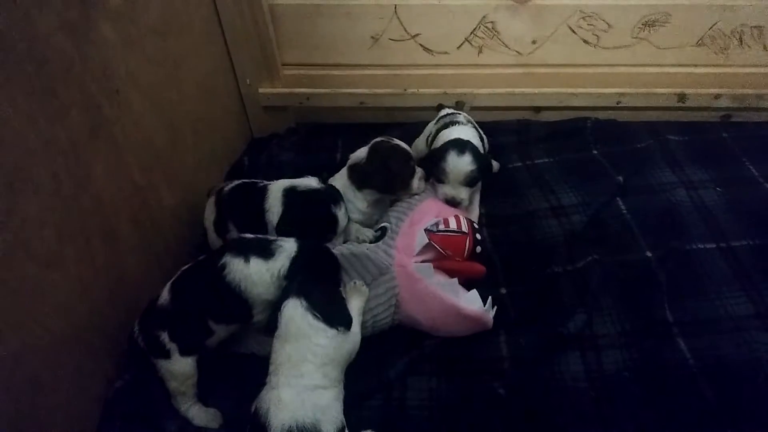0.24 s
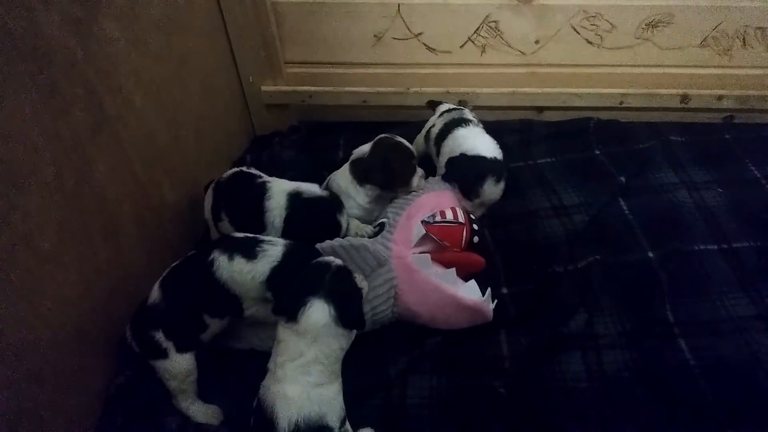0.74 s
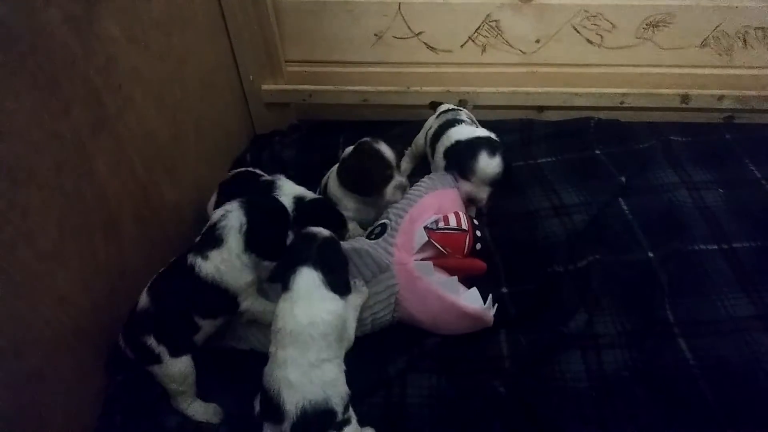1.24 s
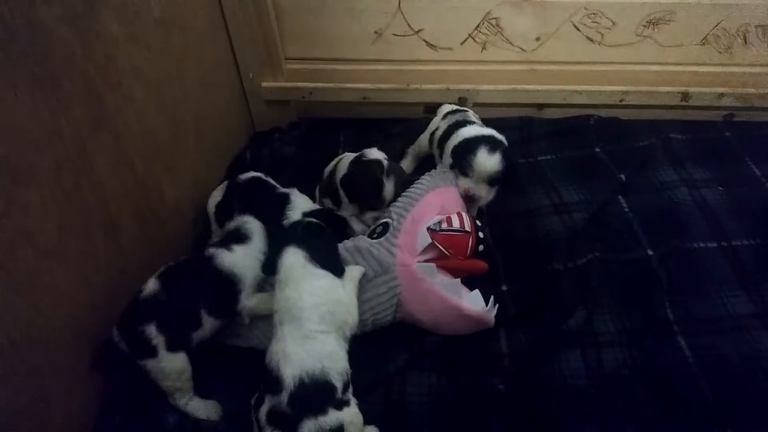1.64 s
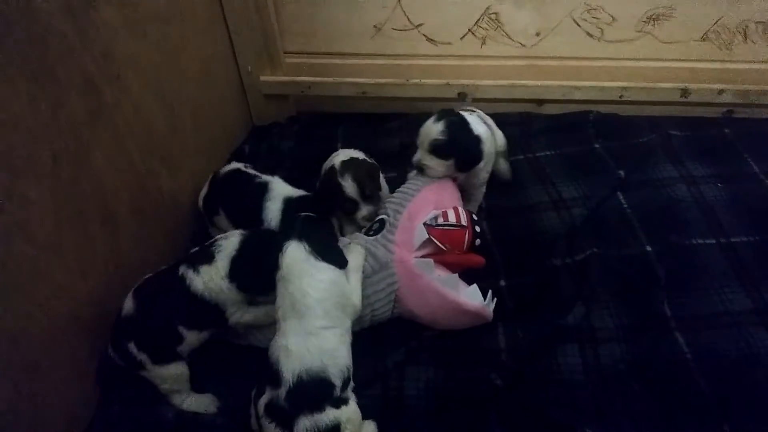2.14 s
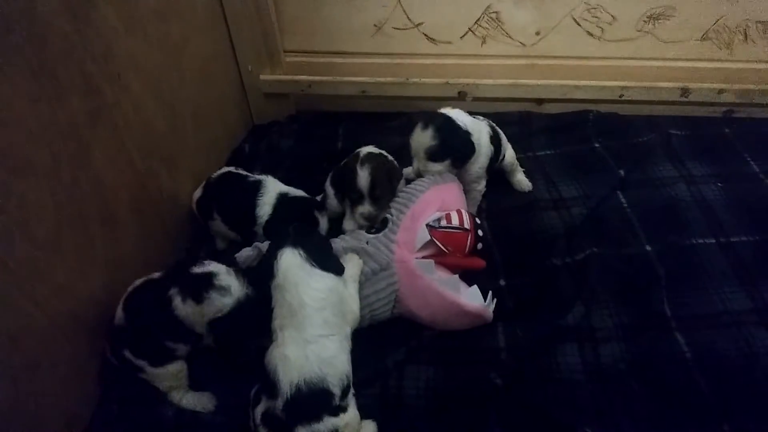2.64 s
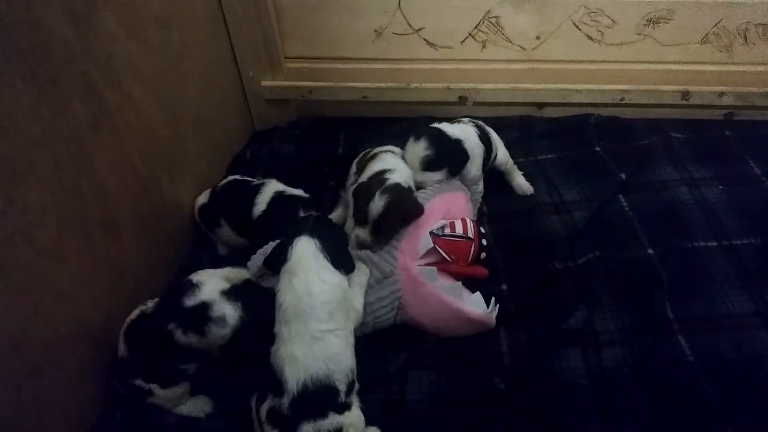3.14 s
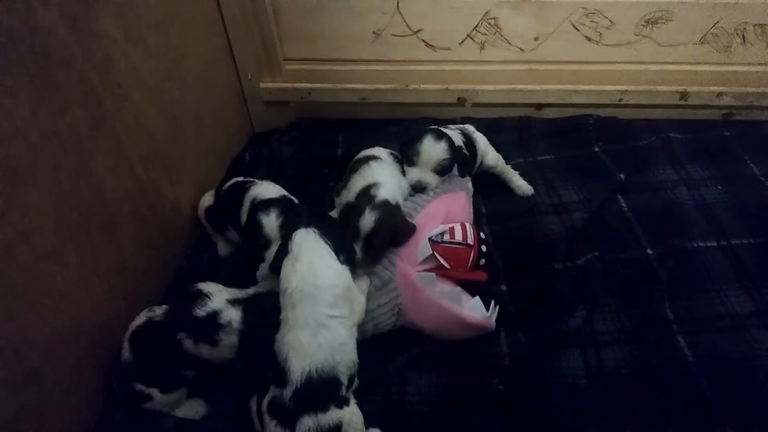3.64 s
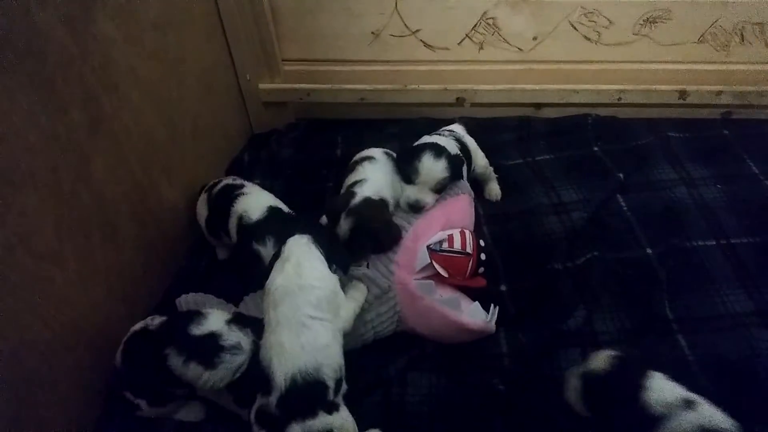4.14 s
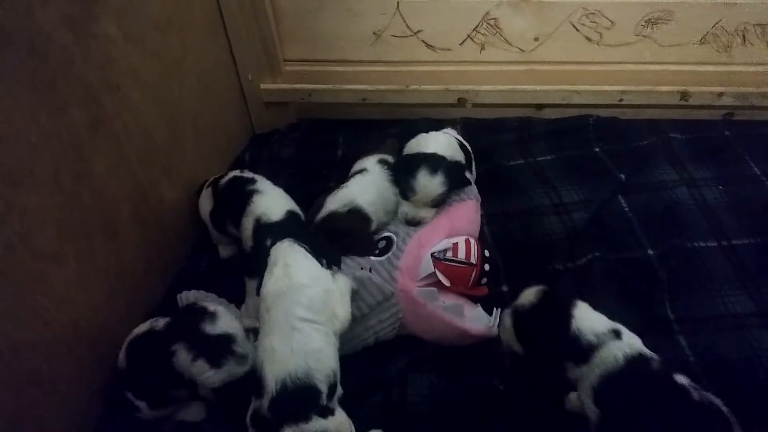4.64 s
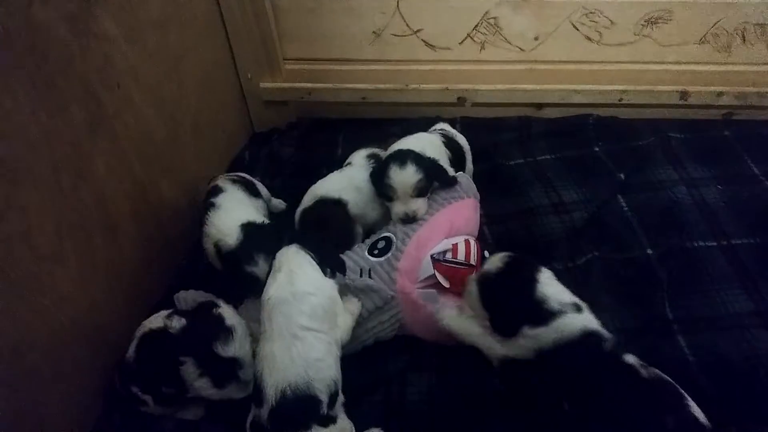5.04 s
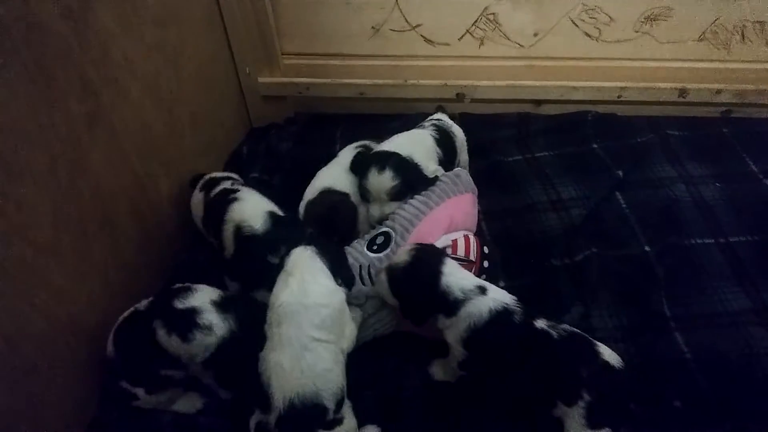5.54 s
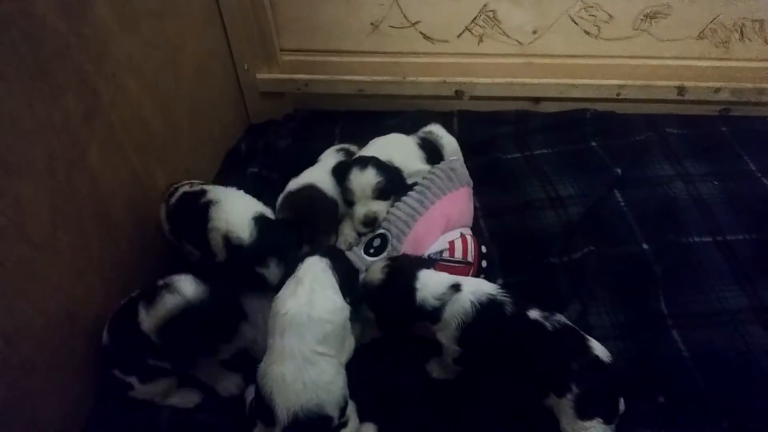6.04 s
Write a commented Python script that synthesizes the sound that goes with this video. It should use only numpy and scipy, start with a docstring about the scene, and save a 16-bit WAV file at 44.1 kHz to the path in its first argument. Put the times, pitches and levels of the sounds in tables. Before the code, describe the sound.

Close, dry crinkling of a film-lined plush toy being chewed and tugged in a small wooden box. A crisp burst opens at 0 s, followed by small ticks and light rustles, fairly sparse until about 1 s. Crackle swells from 1.1 s, and at 1.5-1.6 s strong bright snaps arrive. A tight cluster of loud snaps comes at 2.05-2.15 s, then a deep soft thud near 2.3 s. From 2.5 to 3.5 s the crinkle is dense and vigorous; it thins briefly around 3.6-3.9 s, then returns in irregular tugs with sharp pops near 4.0, 4.25 and 4.5 s. The hardest snaps fall around 4.8-5.0 s, another cluster at 5.2-5.35 s, and crackling continues to the end near 6.3 s. Muffled paw bumps and cloth scuffs stay quiet underneath. The tail is very short, the quiet gaps are damped, and a faint low-weighted hiss remains.

```python
"""Puppies with a crinkly toy

Puppies chew and tug a plush toy lined with crinkly film inside a wooden box, close to a phone.
The film buckles in loud snaps and dense crackle, made of short noise bursts in the film's colour.
Paws thud on the blanket and boards as low rings roughened by noise; the walls add a short noise tail.
The phone's noise suppressor dims every band that falls quiet, and a faint hiss lies over the result."""
import sys
import numpy as np
from scipy import signal
from scipy.fft import rfft, irfft
from scipy.io import wavfile
from scipy.ndimage import uniform_filter1d

SR = 44100
rng = np.random.default_rng(int(sys.argv[2]) if len(sys.argv) > 2 else 0)


def bounce(signal):
    """Save signal as a 16-bit WAV file at the path given by the first command-line argument."""
    frames = np.transpose(np.atleast_2d(signal))
    limited = np.clip(frames, -1, 1)
    pcm = np.round(limited * 32767).astype(np.int16)
    wavfile.write(sys.argv[1], SR, pcm)


N = 277830  # length in samples


def amp(db):
    """Amplitude factor for a level in dB."""
    return 10 ** (np.asarray(db) / 20)


def evened(x):
    """Signal scaled to an RMS of one."""
    return x / np.sqrt(np.mean(x ** 2) + 1e-20)


def read(points, hz):
    """Curve through (Hz, value) points, straight on a logarithmic frequency axis."""
    f, value = np.transpose(points)
    return np.interp(np.log(hz + 1), np.log(f + 1), value)


def causal(db, size=2048):
    """Impulse response with the given gain in dB and no ringing before the blow (minimum phase)."""
    mirrored_db = np.r_[db, db[-2:0:-1]]
    log_gain = np.log(amp(np.maximum(mirrored_db, -100)))
    spectrum = np.exp(np.conj(signal.hilbert(log_gain)))
    return np.fft.ifft(spectrum).real[:size]


def smooth(x, size):
    """Noise slowed down to about one change in every size samples, at an RMS of one."""
    return evened(uniform_filter1d(uniform_filter1d(x, size), size))


def add(mix, s, sound):
    """Mix a sound in at s seconds, cut off at the end of the mix."""
    part = mix[round(s * SR):][:len(sound)]
    part += sound[:len(part)]


def film_parts():
    """Impulse responses of the deep, middle and fine parts of the film's colour, each of unit energy."""
    # Colour of the film heard through the microphone port. Each row: frequency in Hz, gain in dB.
    film_colour = [(300, -33.5), (600, -29), (1000, -13), (1800, -7.5), (2300, -13), (3000, -5.5),
                   (4300, 0), (5500, -2), (6600, -16), (9300, -22), (11200, -15), (15300, -19.5),
                   (16000, -51.5)]
    hz = np.fft.rfftfreq(4096, 1 / SR)
    colour_db = read(film_colour, hz)
    deep = 1 / (1 + (hz / 2300) ** 12)
    fine = 1 / (1 + (7200 / (hz + 1)) ** 10)
    middle = np.sqrt(1 - deep) - fine
    parts = []
    for share in (deep, middle, fine):
        part = causal(colour_db + 10 * np.log10(np.abs(share) + 1e-9))
        parts.append(part / np.linalg.norm(part))
    return parts


def tug_levels():
    """Deep, middle and fine crackle levels in dB: each tug swells, peaks and fades; their powers add."""
    # Bites and tugs on the toy. Each row: strongest moment in seconds, swell in seconds, fade in seconds,
    # middle crackle level in dB, large creases under 2.3 kHz in dB re middle,
    # fine creases over 7.2 kHz in dB re middle.
    tug_rows = [(0.0, .01, 0.065, -35.5, -10.5, -16), (.142, 0.023, 0.11, -43, -12, -16),
                (0.352, 0.094, 0.14, -42, -7, -16), (.5, 0.17, .1, -47.5, -22, -8),
                (.62, 0.13, 0.089, -49, -6, -13), (.795, 0.011, 0.06, -48.5, -7, -9),
                (0.88, 0.057, 0.18, -49, -20, -12), (1.025, 0.053, 0.049, -46.5, -1.5, -32),
                (1.102, 0.064, 0.061, -37, -8, -13.5), (1.231, 0.064, 0.052, -38, -15, -14.5),
                (1.309, 0.045, 0.36, -48, -7.5, -10), (1.486, 0.069, 0.22, -31, -10, -8),
                (1.642, 0.04, 0.063, -29.5, -12.5, -7), (1.77, 0.091, 0.4, -42, -12, -13),
                (1.868, 0.024, 0.033, -34, -8, -9.5), (2.06, 0.0061, 0.18, -34, -11, -9),
                (2.26, 0.18, 0.16, -34.5, -12.5, -7.5), (2.36, 0.023, 0.29, -37, -7.5, -5),
                (2.573, 0.15, 0.15, -30, -15.5, -8), (2.765, 0.0088, 0.087, -43, -18, -20),
                (2.954, 0.027, .12, -29, -15, -8), (3.048, 0.031, 0.13, -30.5, -16.5, -8.5),
                (3.145, 0.18, 0.071, -30.5, -18, -14), (3.26, 0.047, 0.13, -45, -36, -10),
                (3.343, 0.027, 0.19, -27.5, -14.5, -11), (3.48, 0.18, 0.0333, -31.5, -21.5, -12),
                (3.608, 0.081, 0.22, -40.5, -33, -13.5), (3.831, 0.38, 0.58, -39, -11.5, -14),
                (3.991, 0.22, 0.34, -42, -14, -8.5), (4.277, 0.18, 0.24, -34.5, -13, -10),
                (4.501, 0.11, 0.18, -45, -5, -4.5), (4.631, 0.19, 0.12, -31, -15, -11),
                (4.822, 0.014, .2, -35, -41, -24), (4.935, .2, 0.18, -35.5, -10, -8),
                (5.092, 0.042, .3, -37.5, -12.5, -11.5), (5.285, 0.083, 0.088, -33, -13, -11),
                (5.412, 0.014, 0.045, -35, -20, -11.5), (5.54, 0.089, 0.12, -46.5, -11.5, -16),
                (5.669, .25, 0.15, -35, -12.5, -13), (5.86, .1, 0.084, -46, -9.5, -29),
                (5.924, 0.06, 0.14, -35, -10, -15), (6.122, 0.37, 0.053, -40, -14, -14.5),
                (6.176, 0.037, 0.12, -35, -13.5, -14.5), (6.287, 0.062, 0.27, -33, -8.5, -10)]
    rest_db = np.array([[-92], [-91], [-70]])  # the toy at rest: deep, middle and fine
    ends_db = -15  # level one swell before and one fade after the strongest moment, re that moment
    t = np.arange(N // 64 + 2) * 64 / SR
    power = amp(rest_db) ** 2
    for s, swell, fade, db, deep_db, fine_db in tug_rows:
        away = np.where(t < s, (s - t) / swell, (t - s) / fade)
        part_db = np.array([[deep_db], [0], [fine_db]])
        power = power + amp(db + ends_db * away + part_db) ** 2
    return [np.interp(np.arange(N) / SR, t, 10 * np.log10(p)) for p in power]


def buckles(sizes, t60, colour_db, count=30):
    """Every blow in the train plays one of count short bursts, each crease with a colour of its own."""
    t, out = np.arange(512) / SR, np.zeros(N)
    shape = rng.integers(0, count, N)  # which burst a blow at each sample would play
    bursts = rng.standard_normal((count, len(t))) * amp(-60 * t / t60)
    bumps = uniform_filter1d(rng.standard_normal((count, 257)), size=24, axis=1)
    colours = colour_db * evened(bumps)
    for k in range(count):
        burst = np.convolve(bursts[k], causal(colours[k], size=128))
        burst /= np.linalg.norm(burst)
        out += signal.oaconvolve(sizes * (shape == k), burst)[:N]
    return out


def crackle():
    """Many small buckles of uneven size, coming in clumps over a fabric rustle, all following the tugs."""
    typical_per_s, typical_db = 500, -41  # buckles a second when the middle crackle has this level
    spread_db, rustle_db = 1, -7  # mean rise in buckle size; rustle re buckles
    levels = tug_levels()
    # a harder tug buckles more creases a second
    rate = typical_per_s * amp(.6 * np.maximum(levels[1] - typical_db, -12))
    clumps_db = 1.05 * smooth(rng.standard_normal(N), 250)
    sizes = amp(spread_db * np.minimum(rng.exponential(1, N), 5.5))
    sizes *= rng.random(N) < rate / SR  # buckles fall at random moments
    sizes *= np.sqrt(typical_per_s / rate)  # denser crackle stays equally loud; the tugs set the level
    film = evened(buckles(sizes, t60=.004, colour_db=6.5))
    drive = film + amp(rustle_db) * rng.standard_normal(N)
    drive = evened(drive * amp(clumps_db))
    out = np.zeros(N)
    for level, part in zip(levels, film_parts()):
        out += signal.oaconvolve(drive * amp(level), part)[:N]
    return out


def hiss():
    """Faint electronic noise of the phone, strongest in the bass."""
    # Steady hiss. Each row: frequency in Hz, relative spectral level in dB per Hz.
    hiss_colour = [(25, -40), (50, 3.5), (85, 1.5), (200, -6), (800, -13), (4000, -15.5), (9000, -28),
                   (15000, -31)]
    level_db = -73.5  # RMS
    z = rfft(rng.standard_normal(N)) * amp(read(hiss_colour, np.fft.rfftfreq(N, 1 / SR)))
    return amp(level_db) * evened(irfft(z, N))


def snaps():
    """Loud buckles: a sharp noise burst across the whole band, heard through the film's three parts."""
    # Single loud buckles of the film. Each row: start in seconds, peak of the middle part in dB,
    # deep part in dB re middle peak, fine part in dB re middle peak.
    snap_rows = [(0.0073, -19.5, -28, -19), (0.1071, -30.5, -46, -46), (0.141, -27.5, -9.5, -9),
                 (0.2024, -36, -32, -19), (0.2387, -33, -41, -39), (0.275, -28.5, -5, -12),
                 (0.329, -23, -11, -21), (0.3519, -26, -4, -10), (0.4557, -23, -24, -19),
                 (0.4904, -26, -36, -17), (0.5368, -29.5, -43, -12), (0.5885, -27, -12, -13.5),
                 (0.659, -34, -34, -7), (0.7883, -29, -6, -15), (0.812, -32.5, -2.5, -4),
                 (0.849, -34, -17, -6), (0.871, -30.5, -12, -10), (0.927, -39, -25, 1),
                 (1.101, -28.5, -5.5, -12), (1.181, -22.5, -25, -20), (1.2982, -22, -10, -10),
                 (1.4155, -27, -34, -23), (1.4663, -18.5, -21, 0), (1.491, -24, -32, -12),
                 (1.6155, -14.5, -38, -7), (1.644, -20, -30, -7.5), (1.846, -19.5, -45, -5.5),
                 (1.9804, -35.5, -27, 3), (2.0553, -22.5, -11.5, -3), (2.0708, -15, -30, -15),
                 (2.08, -13, -29, -10), (2.0894, -20.5, -29, -15), (2.1261, -16, -4.5, -7),
                 (2.347, -15, -36, -21), (2.3869, -19.5, -25, -26), (2.5237, -26.5, -1, 7),
                 (2.5598, -13, -36, 0), (2.5884, -19, -16, -15), (2.9396, -17.5, -10, -16),
                 (2.9467, -16.5, -35, -16), (3.0691, -20, -17, -12), (3.1303, -15, -14, -8),
                 (3.244, -19, -43, -3.5), (3.332, -16, -16.5, -7), (3.345, -25, -41, -19),
                 (3.386, -18, -21, -17), (3.4572, -13, -27.5, -14), (3.6782, -31, -25, -19),
                 (3.6935, -22, -38, -5.5), (3.8198, -30.5, -3, 2), (3.872, -24, -36, -10),
                 (3.9802, -14.5, -40, -31), (4.0306, -17, -13.5, -34), (4.0503, -25, -10, -7),
                 (4.245, -14.5, -19, -30), (4.3026, -20.5, -28, -17), (4.3616, -19, -32, -8),
                 (4.3915, -17, -10, -11), (4.4927, -14.5, -14, -32), (4.5093, -17.5, -32, -10),
                 (4.6505, -20, -57, -19), (4.8088, -23.5, -18, -11), (4.818, -13.5, -48, -5.5),
                 (4.8662, -26, -32, 3.5), (4.9307, -15, -41, -15), (4.9444, -12.5, -20.5, -32),
                 (4.9811, -11, -26, -10), (5.0858, -17.5, -24, -3.5), (5.1232, -19, -33, -7),
                 (5.1992, -20, -21, -14), (5.2427, -29.5, -3.5, -15), (5.267, -13, -21, -15),
                 (5.283, -19, -31, -33), (5.2925, -14, -31, -9), (5.3162, -16.5, -38, -8),
                 (5.336, -21.5, -15, -6), (5.537, -25.5, -16, -3.5), (5.667, -37, 4, -20),
                 (5.68, -13.5, -22, -25), (5.7914, -26, -34, -14), (5.82, -22, -16.5, -27.5),
                 (5.9092, -16, -17.5, -11), (6.0071, -22.5, -8.5, -17), (6.044, -19, -32, -26),
                 (6.2557, -21.5, -43, -26)]
    t60 = .007  # seconds for the burst to fall 60 dB
    out, t, parts = np.zeros(N), np.arange(600) / SR, film_parts()
    bursts = rng.standard_normal((len(snap_rows), len(t))) * amp(-60 * t / t60)
    for (s, db, deep_db, fine_db), burst in zip(snap_rows, bursts):
        for part, part_db in zip(parts, (db + deep_db, db, db + fine_db)):
            sound = signal.fftconvolve(burst, part)[:len(part)]
            add(out, s, amp(part_db) * sound / np.abs(sound).max())
    return out


def box(x):
    """Wooden walls return a short, dense tail that keeps turning between three noise patterns."""
    t60, gap = .07, .002  # seconds to fall 60 dB; seconds before the tail begins
    wall_hz = 7000  # the soft floor and walls swallow the treble above this
    t, out = np.arange(SR // 4) / SR, np.zeros(N)
    turn = np.pi * 9 * np.arange(N) / SR  # 4.5 turns a second
    tails = rng.standard_normal((3, len(t))) * amp(-60 * t / t60) * (t > gap)
    for k, tail in enumerate(tails):
        share = np.sqrt(2 / 3) * np.cos(turn + k * np.pi / 3)  # the three powers always sum to one
        out += signal.oaconvolve(x * share, tail / np.linalg.norm(tail))[:N]
    return signal.lfilter(*signal.butter(1, wall_hz, fs=SR), out)


def thuds():
    """Soft blows: a low ring whose size and phase are shaken by the cloth, which smears it into a band."""
    # Paws, bodies and cloth landing or dragging. Each row: start in seconds, level in dB,
    # settled pitch in Hz, time to fall 60 dB in seconds, roughness from 0 (clean ring) to 1 (muffled scuff).
    thud_rows = [(.786, -49.5, 1067, 0.64, 0.79), (0.885, -54.5, 268, 0.31, 0.85),
                 (1.468, -50.5, 79.7, 0.44, 1), (1.489, -49.5, 732, 0.24, 1), (1.575, -50.5, 304, 0.077, 1),
                 (1.62, -59, 89, 0.76, 1), (1.86, -43.5, 666, 0.17, 0.68), (2.22, -48, 626, 0.39, 0.84),
                 (2.284, -29.5, 122, 0.2, 1), (2.311, -40, 92, 0.18, 0.16),
                 (2.341, -40.5, 1106, 0.19, 0.77), (2.365, -47, 93, 0.46, 0.66),
                 (2.43, -55.5, 509, 0.68, 0.65), (2.559, -50.5, 558, 0.41, 0.74), (2.593, -44, 117, 0.1, 1),
                 (2.774, -45, 1100, 0.21, 0.8), (2.94, -44, 536, 0.26, 0.95),
                 (2.953, -50.5, 250, 0.14, 0.93), (3.119, -47.5, 251, 0.3, 1), (3.21, -43.5, 145, 0.33, 1),
                 (3.331, -43, 327, 0.25, 0.64), (3.592, -52, 88, 0.18, 0.77), (3.728, -46.5, 298, 0.21, 1),
                 (4.579, -56, 81.5, 0.51, 0.2), (4.63, -49.5, 803, 0.15, 0.82),
                 (4.859, -57, 1000, 0.2, 0.6), (4.975, -49, 304, 0.11, 0.85), (5.036, -47, 179, 0.14, 1),
                 (5.262, -50.5, 96, 0.36, 0.73), (5.408, -44, 736, 0.075, 0.86),
                 (5.409, -41.5, 1223, 0.1, .7), (5.665, -55.5, 521, 0.34, 0.94),
                 (5.667, -40, 883, 0.16, 0.99), (5.815, -50.5, 1250, 0.29, 0.51),
                 (5.813, -47.5, 263, 0.091, 0.7), (6.206, -45, 275, 0.12, 0.42)]
    out, t = np.zeros(N), np.arange(SR // 2) / SR
    rise = 1 - np.exp(-t / .006)
    noises = rng.standard_normal((len(thud_rows), 2, len(t)))
    for (s, db, hz, t60, rough), (a, b) in zip(thud_rows, noises):
        hold = int(1.3 * SR / hz)  # the shake lasts about one cycle
        shake = (smooth(a, hold) + 1j * smooth(b, hold)) / np.sqrt(2)
        glide = 1 + 0.083 * np.exp(-t / 0.029)  # starts 8.3 % sharp, then settles
        turns = np.cumsum(hz * glide) / SR
        wobble = np.sqrt(1 - rough ** 2) + rough * shake
        ring = (wobble * np.exp(2j * np.pi * turns)).imag
        add(out, s, amp(db - 60 * t / t60) * rise * ring)
    return out


def scene():
    """The toy, its return from the box and the thuds, as one channel."""
    box_db = -7.5  # box send re the direct toy
    toy = crackle() + snaps()
    return (toy + amp(box_db) * box(toy) + thuds())[None]


def record(dry):
    """The suppressor dims bands whose recent power is near or under the quiet level; then hiss and band limit."""
    # Level at which the suppressor halves a band's amplitude. Each row: frequency in Hz, level in dB.
    quiet_levels = [(300, -77.5), (700, -69.5), (1200, -65), (2200, -66), (4500, -90), (8000, -84.5),
                    (14000, -84)]
    close_s, edge_hz = .07, 16990  # time constant of the recent power; upper band limit
    hz, t, z = signal.stft(dry[0], SR, nperseg=512, noverlap=384)
    power = uniform_filter1d(np.abs(z) ** 2, size=2, axis=0)
    keep = np.exp(-128 / SR / close_s)
    averaged = signal.lfilter([1 - keep], [1, -keep], power, axis=1)
    recent = np.maximum(averaged, 0.13 * power)  # opens at once, closes slowly
    quiet_power = amp(read(quiet_levels, hz))[:, None] ** 2
    gain = recent ** 2 / (recent ** 2 + quiet_power ** 2)
    kept = signal.istft(z * gain, SR, nperseg=512, noverlap=384)[1][:N]
    band_limit = signal.firwin(511, edge_hz, window=("kaiser", 9), fs=SR)
    return signal.oaconvolve(kept + hiss(), band_limit, "same")[None]


dry = scene()
out = record(dry)
bounce(out)
```